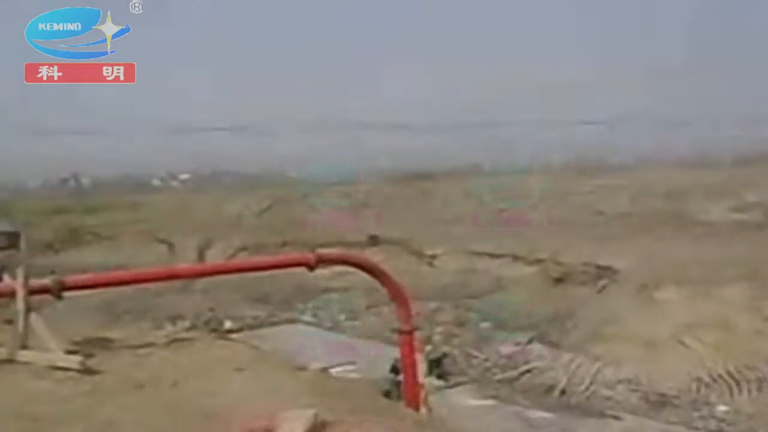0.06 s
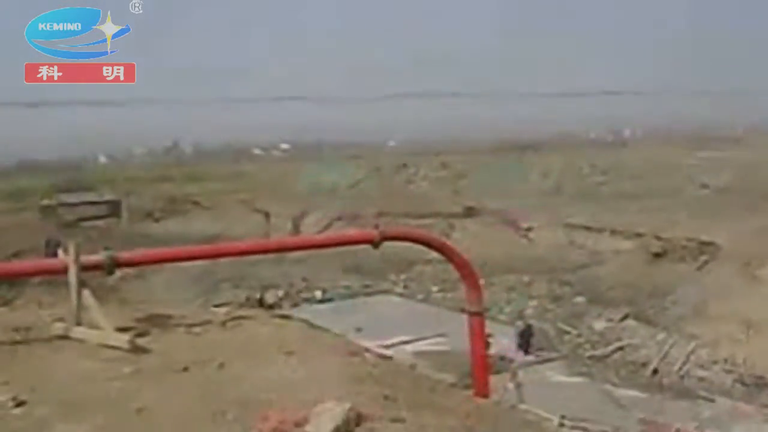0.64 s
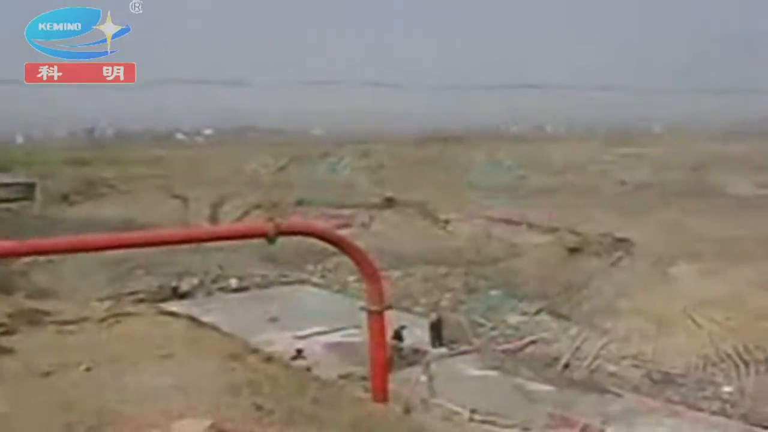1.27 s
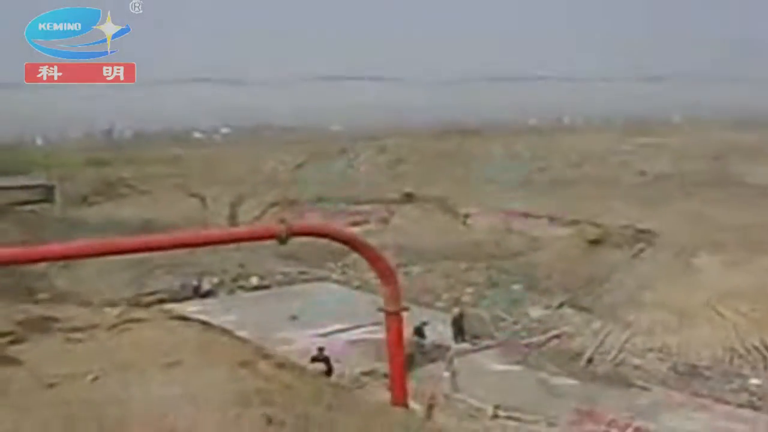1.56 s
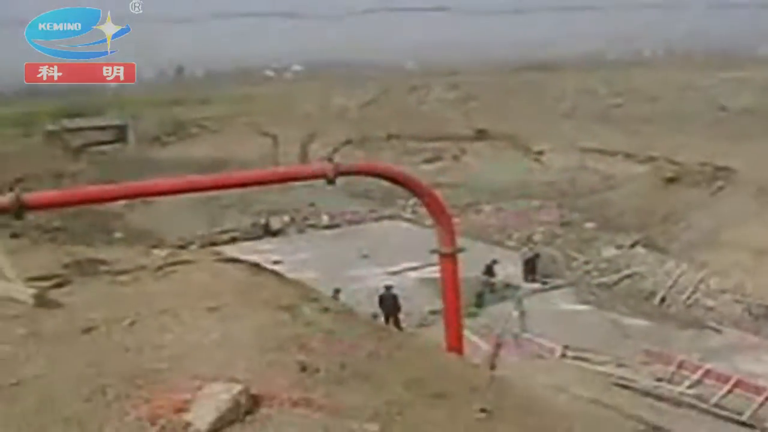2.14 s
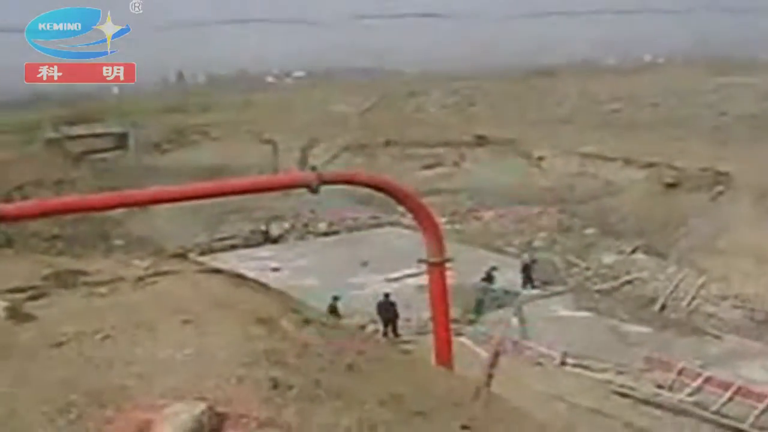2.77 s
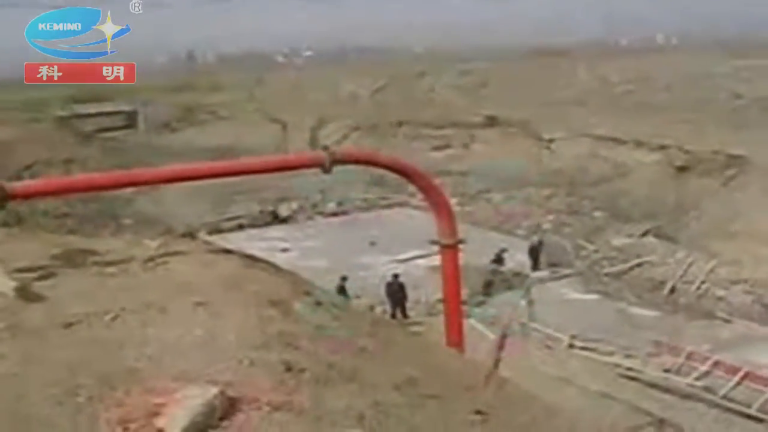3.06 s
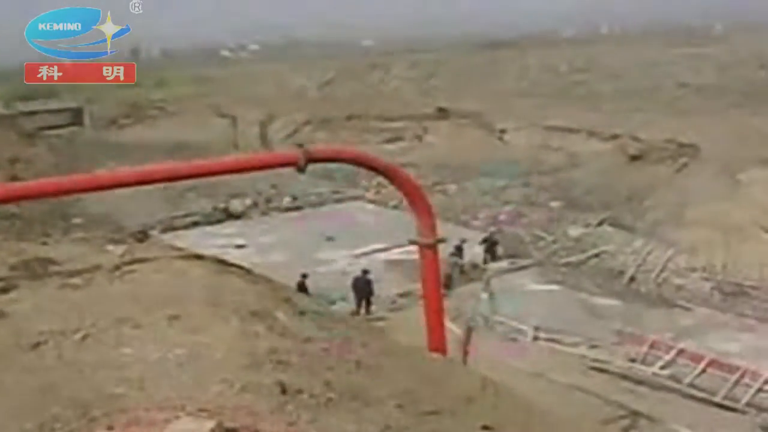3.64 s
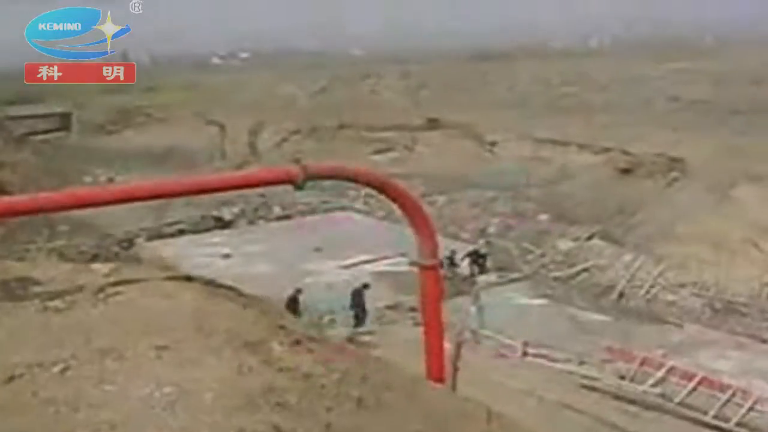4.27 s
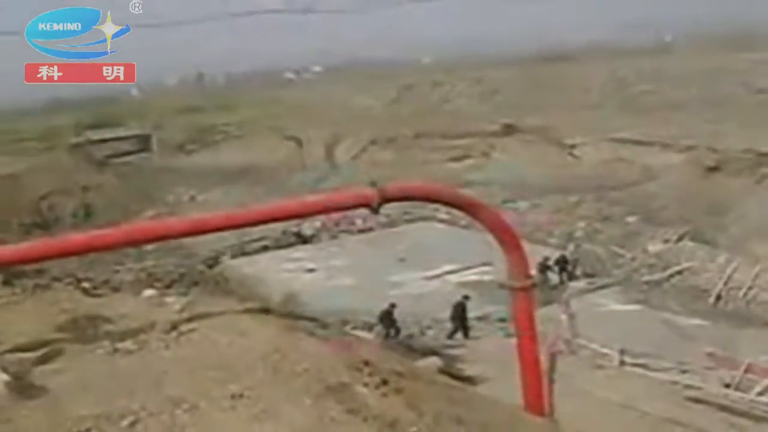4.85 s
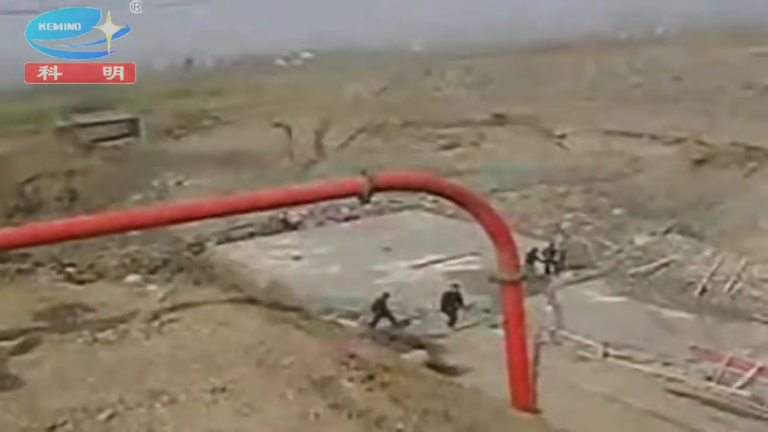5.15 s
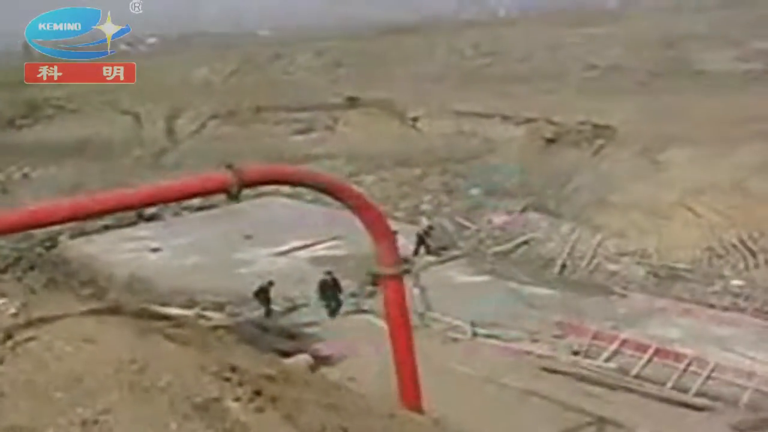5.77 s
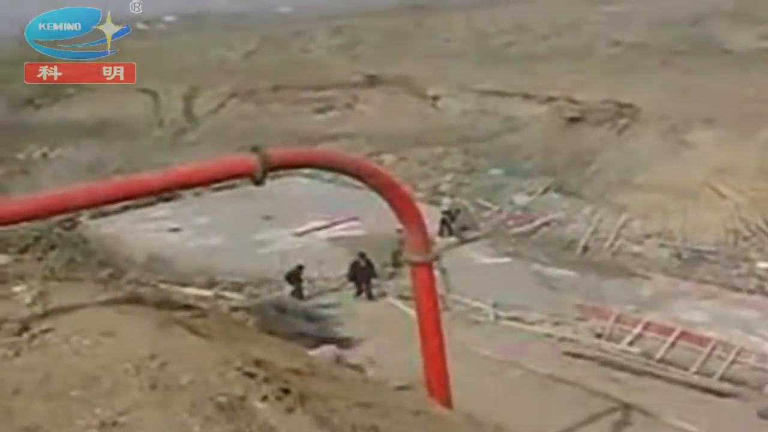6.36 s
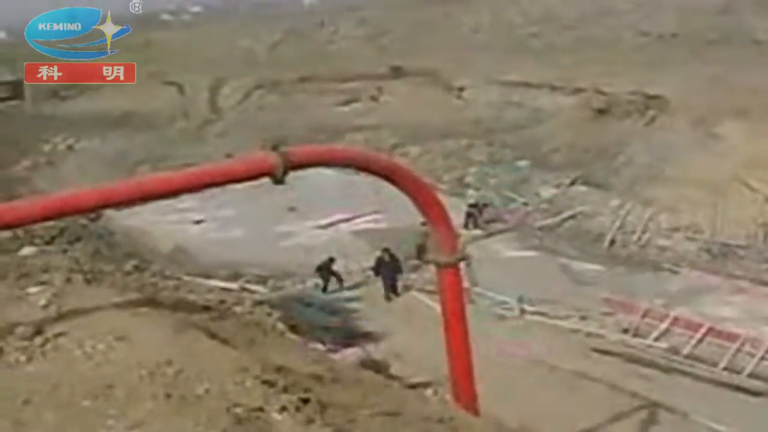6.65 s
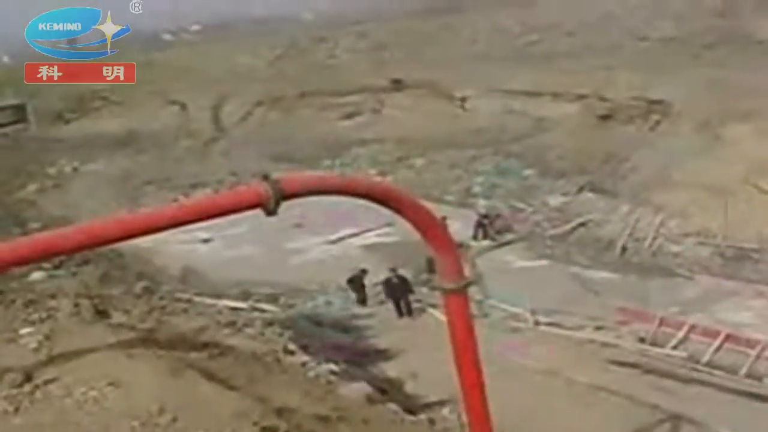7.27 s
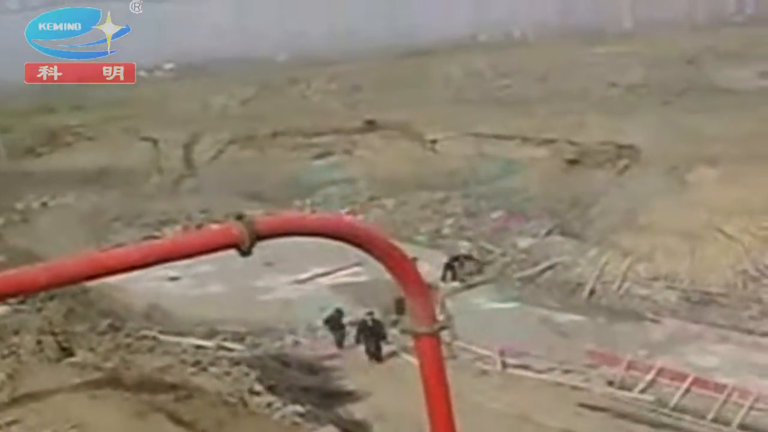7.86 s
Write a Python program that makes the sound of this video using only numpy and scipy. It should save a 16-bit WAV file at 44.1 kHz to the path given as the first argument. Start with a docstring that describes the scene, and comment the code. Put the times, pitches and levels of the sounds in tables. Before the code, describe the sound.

A diesel concrete pump drones some way off on an open building site for the whole eight seconds, a broad roar with a fast-throbbing, mid-pitched whine and a faint ring of steel panels. The whine wavers, dips around 2 to 3 seconds and is stronger from about 5 seconds. Pump strokes come at roughly 0.3, 3.6 and 6.9 seconds: each is a metallic valve clack and a short rasping crunch of concrete, surrounded by a cluster of hollow knocks in the nearby steel pipe. Between them, grit scrapes softly and unevenly, and stones give small dry ticks on the pipe wall, most often from 3.5 to 6.5 seconds. A light breeze rumbles on the microphone, gusting slightly around 5.5 seconds. The sound is somewhat dull and overloads a little on the strokes, with a faint sizzle on top.

```python
"""A diesel concrete pump runs steadily some way off on an open building site, heard beside its steel pipe.
Neighbouring shaft orders whine near 570 Hz and throb once a turn over a broad roar and ringing panels. Every
3.3 s a stroke clacks the valve, knocks the pipe and shoves a rasping slug of concrete through; in between, grit
scrapes and stones tick. A light breeze rumbles on the microphone, whose narrow-band input overloads on the
strokes; now and then a faint, brief sizzle flickers in the top treble."""
import sys
import numpy as np
from scipy import signal
from scipy.fft import rfft, irfft
from scipy.io import wavfile
from scipy.ndimage import map_coordinates

SR = 44100
rng = np.random.default_rng(int(sys.argv[2]) if len(sys.argv) > 2 else 0)


def digitize_waveform(pressure):
    """Quantize a signal to 16-bit integers and store it at the path in sys.argv[1].

    Rows of a 2-D input are taken as channels; values are limited to [-1, 1].
    """
    field = np.atleast_2d(pressure).T
    bounded = np.clip(field, -1, 1)
    quanta = np.round(bounded * 32767).astype(np.int16)
    wavfile.write(sys.argv[1], SR, quanta)


N = 353682
TIME = np.arange(N) / SR

# Engine speed in shaft turns a second (t/s, f/Hz)
SHAFT_SPEED = [(0, 24.68), (1, 24.65), (1.7, 24.64), (2.5, 24.645), (4.1, 24.71), (5, 24.69), (6, 24.705),
               (6.9, 24.68), (8.02, 24.73)]
# Fader ride of the whine's main tone as the air carries it over (t/s, level/dB); all levels are relative
WHINE_RIDE = [(0, -23.5), (0.32, -29.5), (0.4, -15), (0.48, -29), (0.6, -20), (1.08, -17.5), (1.48, -20),
              (1.66, -16), (1.96, -18), (2.2, -36), (2.56, -24.5), (2.68, -19.5), (2.84, -33),
              (2.92, -19.5), (3.08, -36), (3.16, -24), (3.62, -21), (3.7, -19), (4.2, -15.5), (4.8, -16),
              (5.2, -13), (5.45, -12.5), (5.7, -12), (6.36, -9), (6.56, -11.5), (6.64, -20.5), (6.8, -15),
              (6.92, -26), (7.08, -12.5), (7.16, -21.5), (7.26, -12), (7.36, -25), (7.52, -23),
              (7.6, -15.5), (8.02, -12.5)]
# Rides of the tones one shaft order either side (t/s, lower level/dB, upper level/dB)
SIDE_RIDES = [(0, -26, -27), (0.22, -21, -23), (0.4, -30, -28), (0.55, -24, -24.5), (0.72, -23, -22),
              (0.98, -18, -14.5), (1.3, -26.5, -20), (1.42, -35, -22), (1.72, -38, -21), (1.95, -38, -26.5),
              (2.25, -37, -22), (2.6, -37, -27.5), (3.1, -36.5, -24), (3.4, -36, -16.5), (3.6, -44, -25),
              (3.72, -41, -20), (4.05, -32, -23.5), (4.35, -34, -30), (4.68, -22.5, -39), (4.87, -31, -26),
              (5.2, -25.5, -30.5), (5.45, -25, -30), (5.6, -23, -24.5), (6.1, -18.5, -32),
              (6.27, -22.5, -25.5), (6.45, -19, -24.5), (6.72, -26, -19), (6.92, -19, -24),
              (7.05, -28, -20), (7.2, -21, -25), (7.36, -30, -32), (7.65, -19.5, -27), (7.88, -16.5, -39.5),
              (8.02, -27, -36)]
# Weaker engine tones (multiple of the shaft rate, level/dB)
WEAK_TONES = [(2, -42), (11, -39.5), (18.3, -33.5), (21, -38), (46, -33)]
# Colour of combustion and fan noise (f/Hz, level/dB)
ROAR_EQ = [(60, -13), (170, -8), (240, -4.5), (290, -3), (370, -1.5), (480, 1), (620, 4), (760, -0.5),
           (950, 3), (1130, 0), (1400, -4), (1700, -9.5), (2050, -9), (5000, -34.5)]
# Resonances of the steel panels (f/Hz, width/Hz, level/dB)
PANEL_MODES = [(1980, 130, -37.5), (2960, 45, -39.5), (3173, 190, -36.5)]
# How hard the panels rattle (t/s, level/dB)
RATTLE_RIDE = [(0, 2), (1, -0.5), (2.5, 2), (3.6, 0.5), (4.5, -1.5), (4.9, 5), (5.6, 6.5), (5.9, 1),
               (6.6, -1), (8.02, -3)]
# Pump stroke cues (t/s, crunch level/dB, rasp level/dB, clack level/dB)
STROKE_CUES = [(0.331, -8, -7.5, -7.5), (3.618, -16, -9, -14.5), (6.93, -7, -8.5, -13)]
# Low crunch of a shoved slug (f/Hz, level/dB)
CRUNCH_EQ = [(150, -1), (450, -2), (750, 2.5), (1150, 0.5), (1500, -6), (2200, -34)]
# Bright rasp on top of it (f/Hz, level/dB)
RASP_EQ = [(600, 4.5), (1500, 4.5), (2100, -1), (2700, -1), (3800, -2), (5100, -0.5), (6500, -25)]
# Ring of the steel valve (f/Hz, level/dB, t60/s)
VALVE_MODES = [(1115, -14.5, 0.07), (1516, 2, 0.066), (2680, 1.5, 0.08), (2940, -2, 0.06),
               (4900, -7, 0.031)]
# Pipe knocks, clustered round the strokes (t/s, level/dB)
KNOCK_CUES = [(0.01, -10.5), (0.262, -5), (0.283, -6.5), (0.33, -7), (0.362, -12), (0.385, -9.5),
              (0.418, -12), (0.94, -16), (1.425, -19), (3.278, -6), (3.312, -11.5), (3.436, -15),
              (3.574, -5.5), (3.598, -6.5), (3.652, -8), (3.682, -8), (4.875, -17), (5.47, -13),
              (6.866, -6), (6.882, -9), (6.93, -14), (6.966, -7.5), (7.04, -9.5)]
# Ring of the filled pipe (f/Hz, level/dB, t60/s)
PIPE_MODES = [(163.6, -15, 0.11), (220, -4.5, 0.1), (275.2, 1, 0.14), (341.7, -2, 0.14), (434, -0.5, 0.085),
              (550, -11, 0.084)]
# Thud of the pipe's supports (f/Hz, level/dB)
SUPPORT_EQ = [(60, -21), (150, -9), (240, -2.5), (380, -0.5), (600, 0.5), (1200, -6.5), (2500, -31.5)]
# Stray slugs scraping through (middle t/s, length/s, resonance f/Hz, width/Hz, level/dB)
SLUG_CUES = [(0.95, 0.05, 2050, 300, -20), (0.955, 0.08, 1000, 300, -18), (3.48, 0.095, 980, 300, -17.5),
             (3.533, 0.041, 1380, 220, -12), (3.529, 0.025, 950, 250, -14), (3.58, 0.024, 780, 220, -16),
             (3.67, 0.062, 1050, 500, -19), (5.3, 0.31, 1080, 500, -20.5), (6.486, 0.066, 2900, 850, -22.5),
             (6.62, 0.053, 1200, 400, -23)]
# Stones hitting the pipe wall (t/s, level/dB, f/Hz)
STONE_CUES = [(0.846, -6.5, 2680), (0.9577, -11, 2060), (1.707, -14, 3520), (2.0662, -11.5, 4560),
              (2.1091, -10, 4220), (3.4461, -13, 4060), (3.4655, -12, 2320), (3.5245, -5.5, 2880),
              (3.8267, -8, 2100), (3.8467, -13, 4370), (3.9676, -7.5, 2970), (4.1061, -8, 2870),
              (4.1434, -12, 4370), (4.3846, -6.5, 2980), (4.4634, -9, 3290), (4.7187, -6.5, 3100),
              (5.005, -7.5, 3280), (5.2764, -10, 2980), (5.3133, -12, 3080), (5.5217, -7.5, 3110),
              (5.58, -7.5, 3140), (6.1243, -5, 3110), (6.2724, -10, 2060), (6.4752, -7, 2690),
              (6.5086, -12, 3160), (7.006, -5.5, 2870), (7.5323, -5, 2830)]
# Crack of a stone (f/Hz, level/dB)
STONE_EQ = [(600, -8), (1500, 2), (2900, 5), (3800, -0.5), (4900, 9), (6300, -10.5)]
# Scrape of sand and gravel (f/Hz, level/dB)
GRIT_EQ = [(900, -9.5), (1600, -5), (2020, -4.5), (2450, -0.5), (2800, 1.5), (3080, 0.5), (3500, -1.5),
           (3900, -2), (4700, -1), (5200, -5), (5800, -8.5), (6500, -31.5)]
# How hard the grit scrapes as the flow changes (t/s, level/dB)
FLOW_RIDE = [(0, -25.5), (0.7, -27.5), (1.15, -27), (1.7, -26), (2.4, -27.5), (2.75, -25), (3.2, -26.5),
             (3.6, -24.5), (4.3, -25.5), (5.1, -25), (5.42, -23.5), (5.92, -26.5), (6.3, -22.5),
             (6.8, -26.5), (8.02, -26)]
# Wind rumble on the microphone (f/Hz, level/dB)
WIND_EQ = [(15, -13.5), (30, -5), (45, -1.5), (70, 1.5), (120, -3.5), (220, -7), (500, -31)]
# Bed of breeze (t/s, level/dB)
BREEZE_RIDE = [(0, -36), (1.2, -31.5), (2.45, -39), (2.8, -33.5), (4, -30), (4.7, -35), (8.02, -31.5)]
# Gusts (middle t/s, length/s, level/dB)
GUST_CUES = [(0.79, 0.14, -36), (3.36, 0.21, -29.5), (3.65, 0.18, -30), (4.25, 0.27, -35.5),
             (5.44, 0.23, -26), (5.68, 0.35, -26.5), (6.92, 0.1, -27), (7.96, 0.1, -30.5)]
# Brief sizzles in the top treble (middle t/s, centre f/Hz, level/dB)
SIZZLE_CUES = [(0.345, 6360, -38), (3.625, 10500, -40.5), (3.695, 11000, -56), (4.91, 11500, -52),
               (5.165, 12000, -60), (5.21, 10500, -53), (5.31, 11500, -45.5), (5.485, 13000, -54),
               (5.58, 13500, -53), (5.675, 12000, -55), (5.77, 12500, -62), (6.025, 11000, -50),
               (6.13, 10500, -54), (6.28, 11500, -48), (6.36, 13000, -49), (6.47, 12000, -50),
               (6.875, 13000, -53), (6.94, 9000, -36), (7.26, 11000, -54), (7.705, 10300, -53)]


def shaft_angle(first_throb_s=0.005583):
    """The engine's clock: shaft angle in radians, one full turn per throb."""
    shaft_hz, = curves(SHAFT_SPEED)
    return 2 * np.pi * (np.cumsum(shaft_hz) / SR - shaft_hz[0] * first_throb_s)


def whine(angle, slip_hz=0.06, in_step_s=1.3):
    """Three neighbouring shaft orders beat into one throb a turn, with weaker tones around them."""
    centre_db, = curves(WHINE_RIDE)
    lower_db, upper_db = curves(SIDE_RIDES)
    # the lowest slowly slips out of step, so the hard throb softens to a warble
    slip = 2 * np.pi * slip_hz * (TIME - in_step_s)
    orders = [(22 * angle + slip, lower_db), (23 * angle, centre_db + 1), (24 * angle, upper_db + 0.5)]
    strong = sum(undb(db) * airborne_tone(phase, scatter=0.06) for phase, db in orders)
    weak = sum(undb(db) * airborne_tone(multiple * angle, scatter=0.41) for multiple, db in WEAK_TONES)
    return strong + weak


def roar(angle, start_db=-17, rise_db_per_s=0.2928, throb=0.062, waver_db=0.68):
    """Combustion and fan noise builds slowly and swells a little on every turn of the shaft."""
    level_db = start_db + rise_db_per_s * TIME + waver_db * drift(12)
    return noise(ROAR_EQ) * (1 + throb * np.cos(angle)) * undb(level_db)


def panels(angle, throb=0.24, waver_db=2.5):
    """The machine's steel panels ring, shaken on every turn and for a while rattling harder."""
    rattle_db, = curves(RATTLE_RIDE)
    ring = sum(undb(db + waver_db * drift(5)) * resonance(hz, width) for hz, width, db in PANEL_MODES)
    return ring * undb(rattle_db) * (1 + throb * np.cos(angle))


def strokes(attack_s=0.0024, hold_s=0.024, release_s=0.0091, grain_db=-0.5):
    """The valve clacks over and a slug is shoved through: a short, hard crunch with a rasp on top."""
    crunch, rasp = noise(CRUNCH_EQ), noise(RASP_EQ)
    slug = np.zeros(N)
    for s, crunch_db, rasp_db, _ in STROKE_CUES:
        age = np.maximum(TIME - s, 0)
        shove = (1 - np.exp(-age / attack_s)) * np.exp(-np.maximum(age - hold_s, 0) / release_s)
        slug += shove * (undb(crunch_db) * crunch + undb(rasp_db) * rasp)
    clack_cues = [(s, db) for s, _, _, db in STROKE_CUES]
    clack = struck(clack_cues, VALVE_MODES, attack_s, detune=0.008)
    return slug * undb(grain_db * drift(220)) + clack


def knocks(gain_db=-4, attack_s=0.0025):
    """Knocks ring the damped pipe, a little differently as its filling shifts, and rattle its supports."""
    ring = struck(KNOCK_CUES, PIPE_MODES, attack_s, detune=0.028)
    rattle = hits(KNOCK_CUES, attack_s, decay_s=0.028) * noise(SUPPORT_EQ)
    return undb(gain_db) * (ring + rattle)


def slugs(grain_db=2):
    """Wet gravel scrapes along the steel in hollow, grainy swells."""
    scrapes = sum(swells([(s, length, db)]) * resonance(hz, width)
                  for s, length, hz, width, db in SLUG_CUES)
    return scrapes * undb(grain_db * drift(220))


def stones(crack_db=-7.5, ring_db=-9, attack_s=0.0007, decay_s=0.0071):
    """Larger stones tick on the pipe wall, short and dry, each with a pitch of its own."""
    crack = hits([(s, db) for s, db, _ in STONE_CUES], attack_s, decay_s) * noise(STONE_EQ)
    ring = sum(hits([(s, db)], attack_s, decay_s) * resonance(hz, width_hz=500)
               for s, db, hz in STONE_CUES)
    return undb(crack_db) * crack + undb(ring_db) * ring


def grit(gain_db=1, surge_db=1.5, grain_db=1.5):
    """Sand and gravel scrape through the pipe in uneven, grainy surges."""
    flow_db, = curves(FLOW_RIDE)
    return noise(GRIT_EQ) * undb(flow_db + gain_db + surge_db * drift(32) + grain_db * drift(500))


def wind(flutter_db=2):
    """A light, fluttering breeze rumbles on the microphone and now and then gusts."""
    breeze_db, = curves(BREEZE_RIDE)
    strength = undb(breeze_db) + swells(GUST_CUES)
    return strength * undb(flutter_db * drift(7)) * noise(WIND_EQ)


def sizzle(length_s=0.037, grain_db=1, skirt_ratio=1.49, skirt_db=-14):
    """Faint, short sizzles in the top treble, now duller, now brighter."""
    bursts = np.zeros(N)
    for s, hz, db in SIZZLE_CUES:
        eq = [(hz / 4, 4 * skirt_db), (hz / skirt_ratio, skirt_db), (hz, 0),
              (hz * skirt_ratio, skirt_db), (hz * 2, 3 * skirt_db)]
        bursts += swells([(s, length_s, db)]) * noise(eq)
    return bursts * undb(grain_db * drift(400))


def airborne_tone(phase, scatter):
    """A tone of rms 1 heard through moving air: a direct wave plus a part scattered on the way."""
    air = (1 + scatter * (drift(13) + 1j * drift(12))) / np.sqrt(1 + 2 * scatter ** 2)
    return np.sqrt(2) * np.real(air * np.exp(1j * phase))


def struck(cues, modes, attack_s, detune):
    """Hits (t/s, level/dB) ring modes (f/Hz, level/dB, t60/s), with fresh tuning and phase each time."""
    ring = np.zeros(N)
    hz, mode_db, t60 = np.transpose(modes)[:, :, None]
    age = np.arange(SR // 4) / SR
    decay = np.exp(-np.log(1000) * age / t60)
    for (s, db), chance in zip(cues, rng.standard_normal((len(cues), len(modes), 2))):
        tuning, phase = 1 + detune * chance[:, :1], chance[:, 1:]
        waves = np.sin(2 * np.pi * (hz * tuning * age + phase))
        hit = np.sum(undb(db + mode_db) * waves * decay, axis=0)
        start = int(s * SR)
        ring[start:start + len(age)] += hit * (1 - np.exp(-age / attack_s))
    return ring


def hits(cues, attack_s, decay_s):
    """Percussive envelope: each cue (t/s, level/dB) rises quickly and dies away."""
    envelope = np.zeros(N)
    for s, db in cues:
        age = np.maximum(TIME - s, 0)
        envelope += undb(db) * (1 - np.exp(-age / attack_s)) * np.exp(-age / decay_s)
    return envelope


def swells(cues):
    """Envelope of smooth swells (middle t/s, length/s, level/dB)."""
    return sum(undb(db) * np.exp(-(2 * (TIME - s) / length) ** 2) for s, length, db in cues)


def noise(eq):
    """Noise of rms 1 coloured by an EQ curve (f/Hz, level/dB), rolling off above the last point."""
    hz, db = np.transpose(eq)
    bin_hz = np.maximum(np.arange(N // 2 + 1) * SR / N, 1)
    gain = undb(np.interp(np.log(bin_hz), np.log(hz), db))
    roll_off = np.minimum(hz[-1] / bin_hz, 1) ** 2
    x = irfft(rfft(rng.standard_normal(N)) * gain * roll_off, N)
    return x / x.std()


def resonance(hz, width_hz):
    """Noise of rms 1 ringing in one resonance."""
    x = signal.lfilter(*signal.iirpeak(hz, hz / width_hz, fs=SR), rng.standard_normal(N))
    return x / x.std()


def drift(rate):
    """Smooth random modulation of spread 1 that changes about rate times a second."""
    x = map_coordinates(rng.standard_normal(8192), [TIME * rate], order=3, mode="wrap")
    return x / x.std()


def curves(table):
    """One automation curve for each value column of a table (t/s, value, ..)."""
    s, *columns = np.transpose(table)
    return [np.interp(TIME, s, column) for column in columns]


def low_pass(x, hz):
    """A steep, zero-phase cut of everything above hz."""
    return signal.sosfiltfilt(signal.ellip(7, 0.1, 45, hz, fs=SR, output="sos"), x)


def undb(db):
    """Decibels to gain."""
    return 10 ** (np.asarray(db) / 20)


def scene():
    """Machine, pipe and wind meet at one microphone, which feeds both channels."""
    angle = shaft_angle()
    machine = whine(angle) + roar(angle) + panels(angle)
    pipe = grit() + stones() + knocks() + strokes() + slugs()
    mono = machine + pipe + wind()
    return np.array([mono, mono])


def record(dry, ceiling=0.83, knee=4, band_hz=6250, top_hz=15800):
    """The narrow-band input soft-clips the peaks; only a faint sizzle lies above its band."""
    rounded = dry / (1 + np.abs(dry / ceiling) ** knee) ** (1 / knee)
    return low_pass(low_pass(rounded, band_hz) + sizzle(), top_hz)


dry = scene()
out = record(dry)
digitize_waveform(out)
```